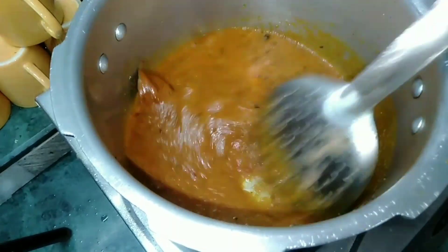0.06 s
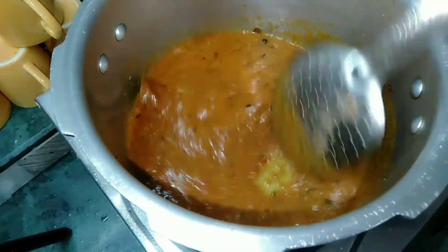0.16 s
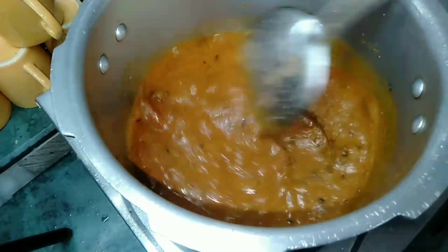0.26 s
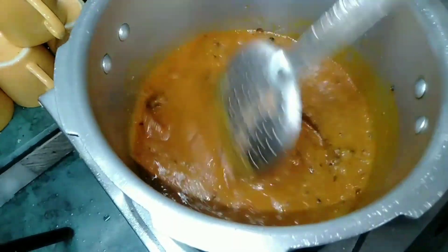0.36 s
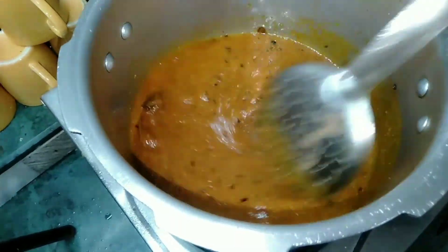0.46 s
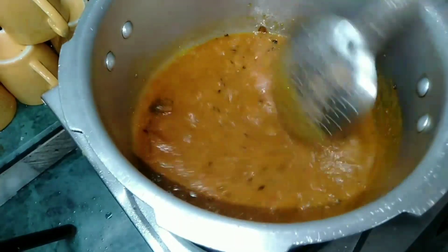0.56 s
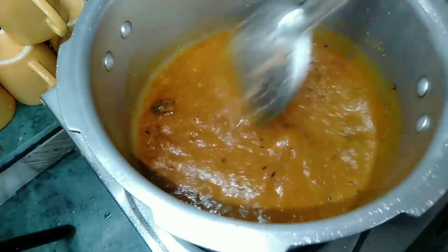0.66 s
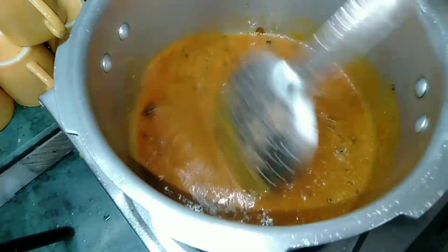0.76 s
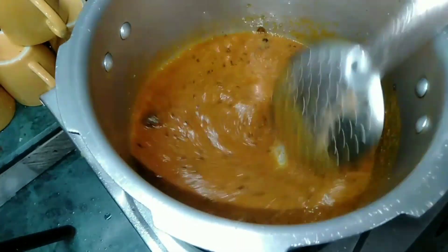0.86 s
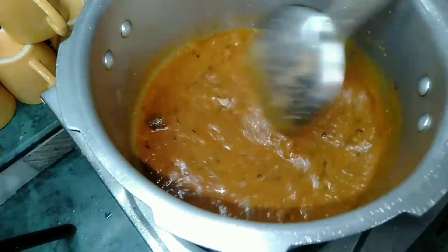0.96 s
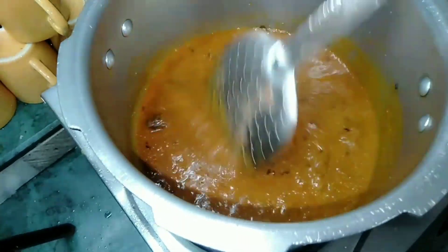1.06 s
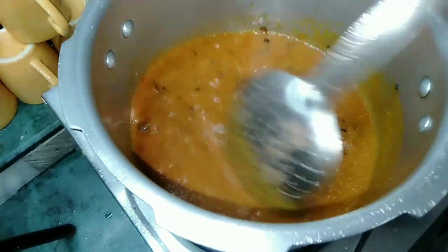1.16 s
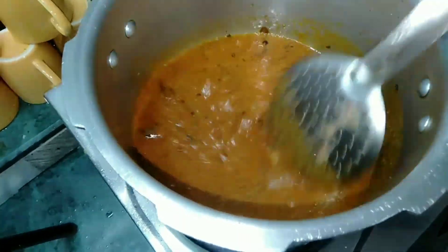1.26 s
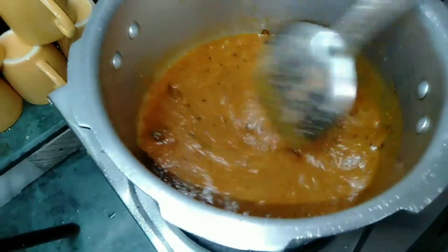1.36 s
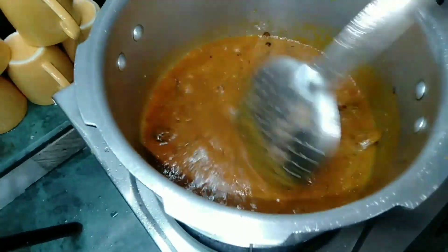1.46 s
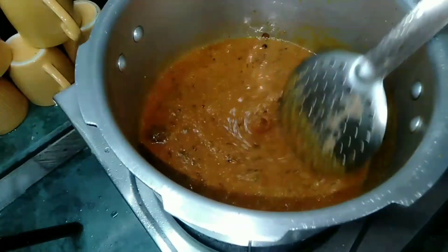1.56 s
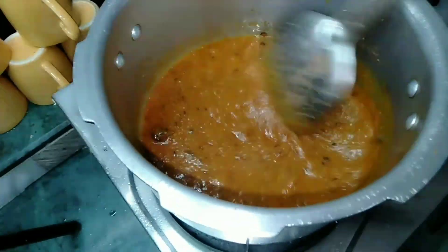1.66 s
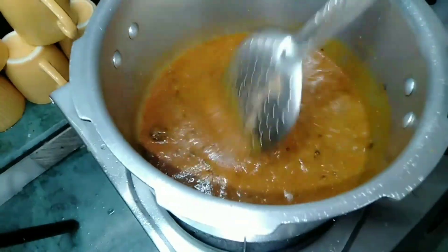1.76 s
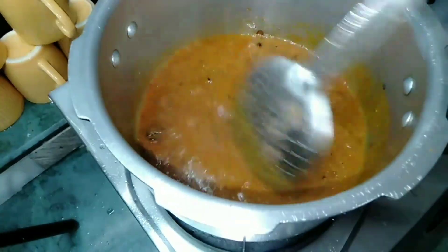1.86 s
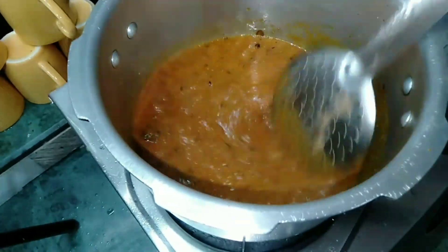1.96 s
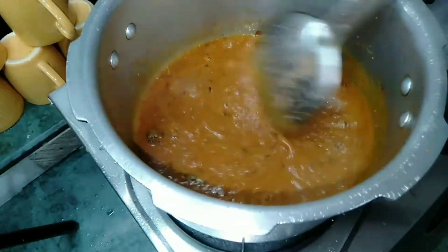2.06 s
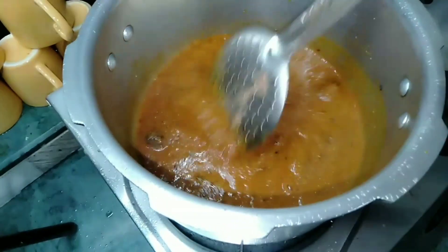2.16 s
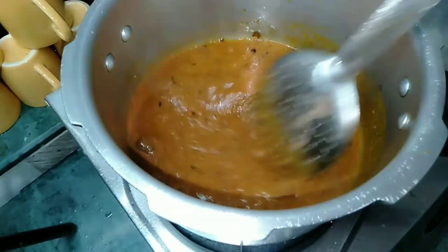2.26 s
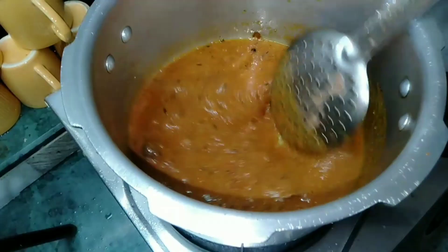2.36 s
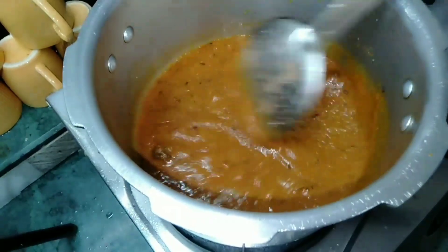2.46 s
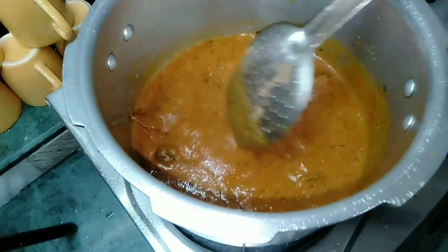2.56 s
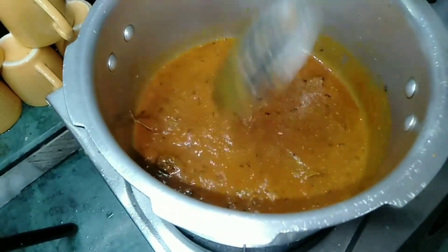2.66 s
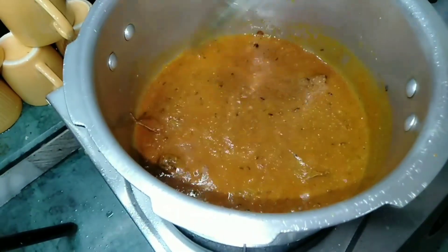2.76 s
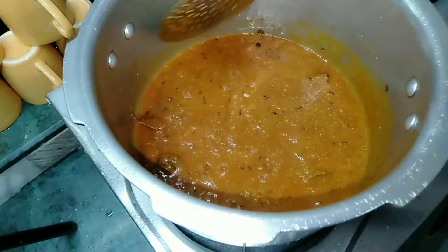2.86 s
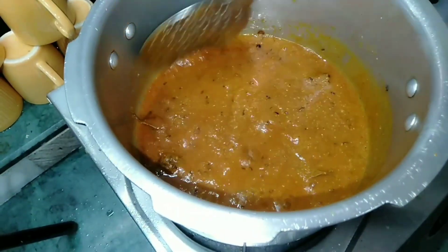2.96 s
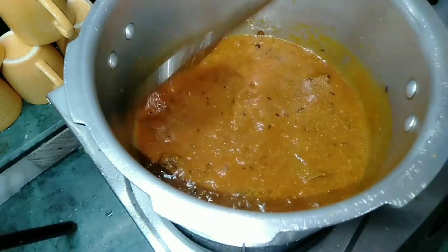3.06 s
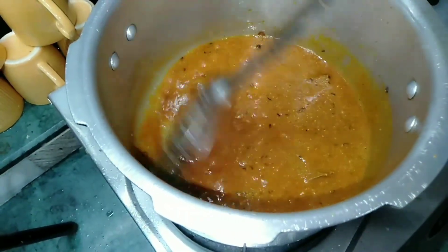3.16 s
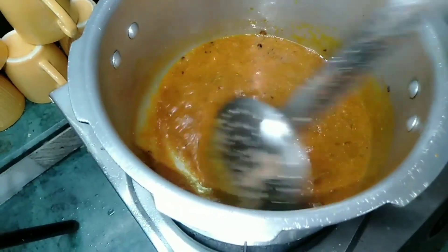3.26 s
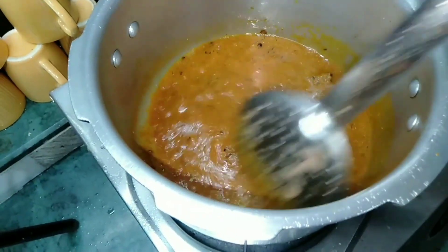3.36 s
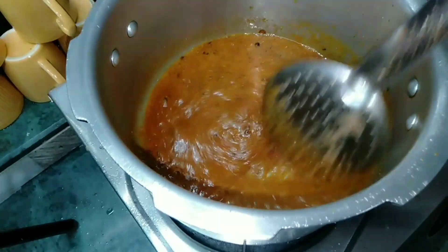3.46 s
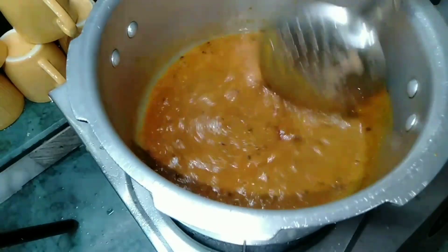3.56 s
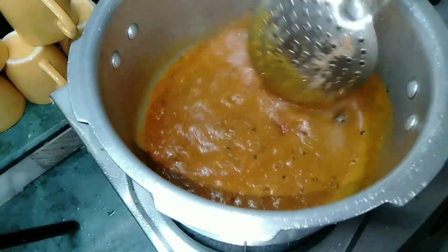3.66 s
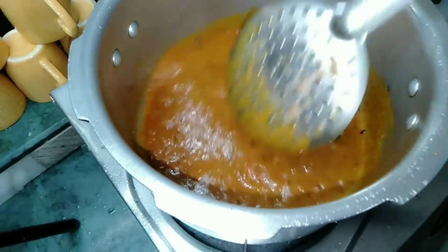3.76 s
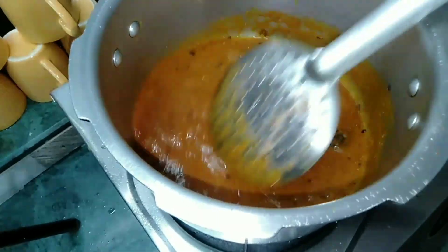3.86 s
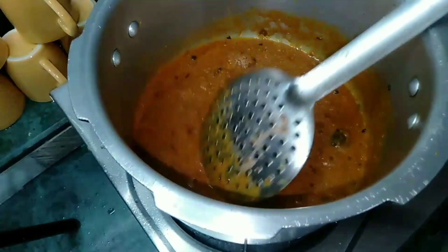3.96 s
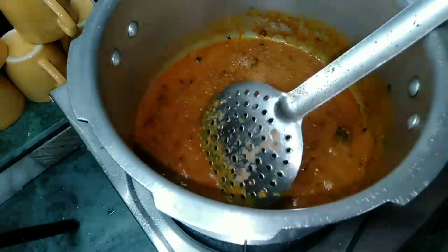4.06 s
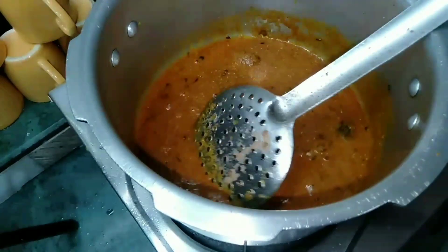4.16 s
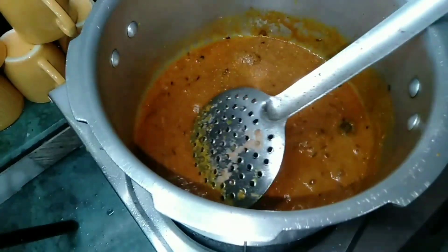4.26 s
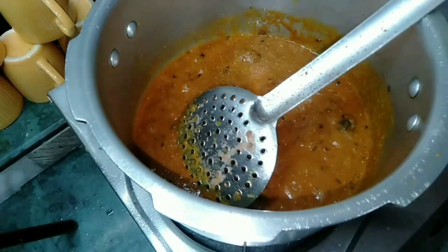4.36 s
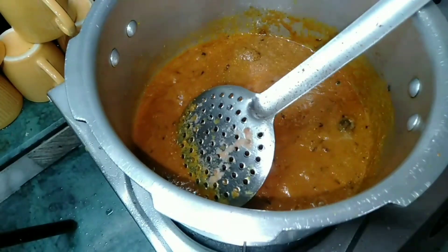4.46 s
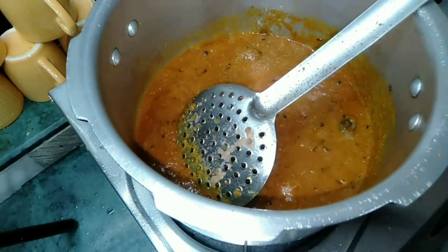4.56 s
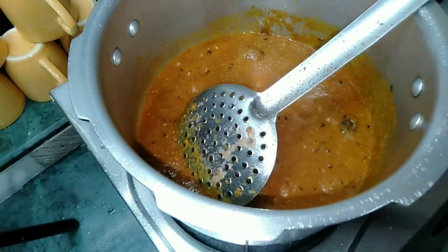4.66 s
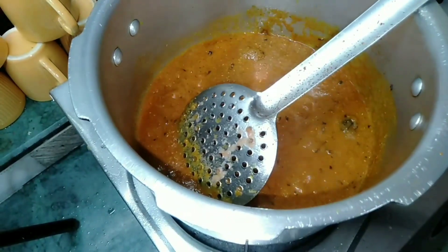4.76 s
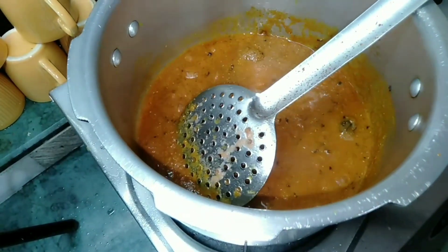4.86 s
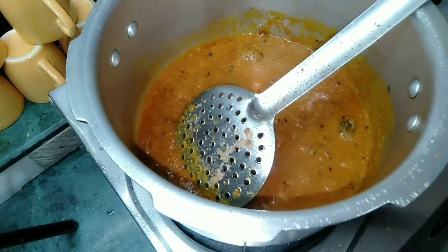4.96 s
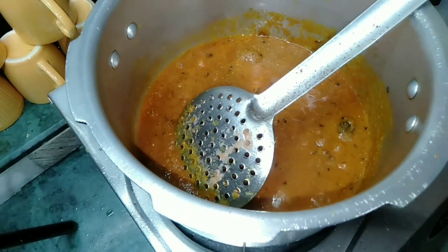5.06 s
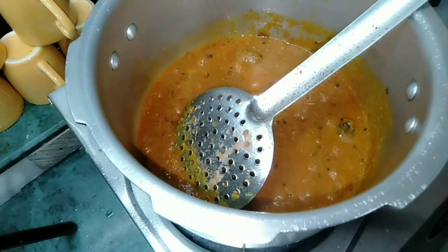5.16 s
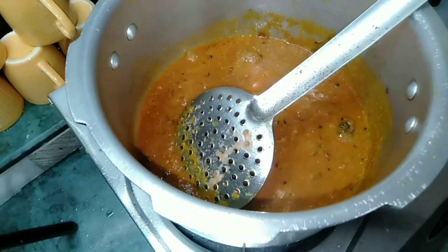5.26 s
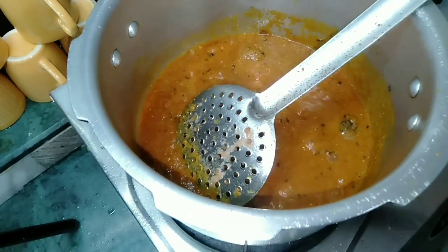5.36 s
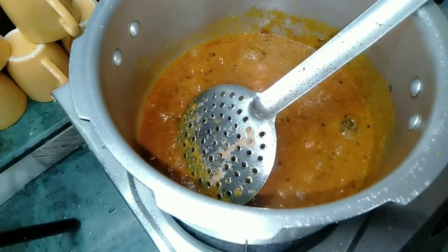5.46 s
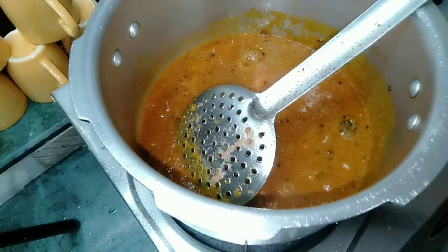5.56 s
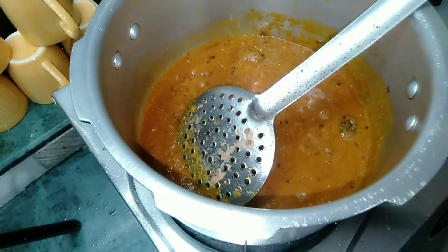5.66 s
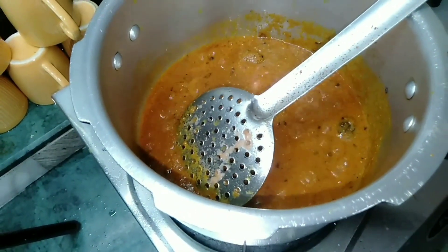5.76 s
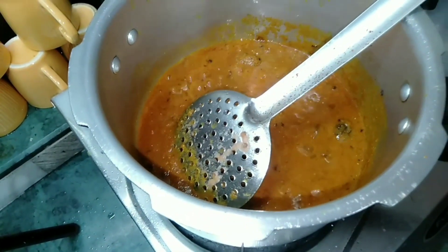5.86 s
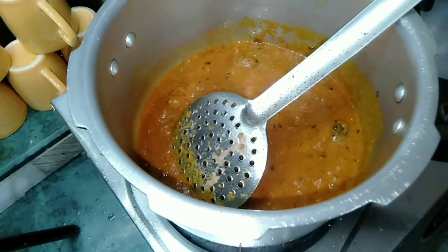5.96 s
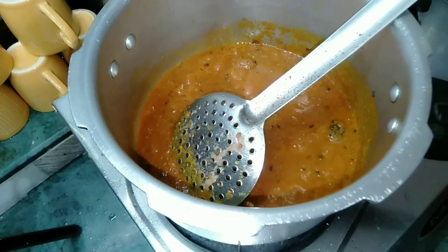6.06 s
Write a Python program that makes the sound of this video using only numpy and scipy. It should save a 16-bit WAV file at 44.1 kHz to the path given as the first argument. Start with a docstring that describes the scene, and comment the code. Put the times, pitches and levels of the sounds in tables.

```python
"""Sizzling pot and spoon

Thick paste sizzles in a metal pot while a spoon scrapes and knocks it, then is laid down.
Stick-slip clicks and blows excite the modes of the metal; small ringing bubbles, sparse clicks
and larger pops make the frying. Escaping steam hisses and whistles; brief gliding tones are gloops
in the paste and squeaks of the shifting spoon. An appliance hums over room noise, and one jolt
pushes the microphone.
"""
import sys
import numpy as np
from scipy import signal
from scipy.io import wavfile
from scipy.ndimage import uniform_filter1d

SR = 44100
rng = np.random.default_rng(int(sys.argv[2]) if len(sys.argv) > 2 else 0)


def rack_gain(trim_db):
    """Turn a fader trim in dB into the linear factor to multiply a signal by."""
    fader = np.asarray(trim_db, float)
    return 10 ** (fader / 20)


def transcribe(u):
    """Save the signal u as a 16-bit wav file named by the first command-line argument.

    u: samples, shape (n,) or (channels, n), limited to [-1, 1]; the rate is SR.
    q: integer samples, one column per channel.
    """
    v = np.clip(np.atleast_2d(u).T, -1, 1)
    q = np.round(v * 32767).astype(np.int16)
    wavfile.write(sys.argv[1], SR, q)


N = 269892


def evened(x):
    """Normalisation: scales a signal to rms 1."""
    return x / np.sqrt(np.mean(x ** 2) + 1e-20)


def curve(rows):
    """Linear interpolation: table columns at every sample, the first column being seconds."""
    s, *columns = np.transpose(rows)
    return [np.interp(np.arange(N) / SR, s, column) for column in columns]


def slow(span):
    """Low-pass random drift: twice averaged noise of rms 1 that holds for about span samples."""
    once = uniform_filter1d(rng.standard_normal(N), int(span))
    return evened(uniform_filter1d(once, int(span)))


def colour(x, points):
    """Minimum-phase filtering: a causal filter of unit energy with the given spectrum."""
    f, db = np.transpose(points)
    hz = abs(np.fft.fftfreq(8192, 1 / SR))
    level_db = np.interp(np.log(hz + 1), np.log(f + 1), db)
    log_gain = np.log(rack_gain(np.maximum(level_db, -100)))
    taps = np.fft.ifft(np.exp(log_gain - 1j * signal.hilbert(log_gain).imag)).real[:4096]
    return signal.oaconvolve(x, taps / np.linalg.norm(taps))[:len(x)]


def band(x, lo_hz, hi_hz):
    """Band-pass filtering by a Butterworth response."""
    return signal.sosfilt(signal.butter(2, [lo_hz, hi_hz], "band", fs=SR, output="sos"), x)


def highpass(x, hz, order):
    """High-pass filtering by a Butterworth response."""
    return signal.sosfilt(signal.butter(order, hz, "high", fs=SR, output="sos"), x)


def resonate(x, hz, width):
    """Damped resonance: one mode, width in Hz; noise of rms 1 leaves with rms near 1."""
    r = np.exp(-np.pi * width / SR)
    turn = 2 * np.pi * hz / SR
    return signal.lfilter([np.sin(turn) * 2 * np.sqrt(1 - r)], [1, -2 * r * np.cos(turn), r * r], x)


def clicks(per_s, spread_db):
    """Shot noise: sparse impulses of rms 1, a few much larger than the rest."""
    size = rack_gain(spread_db * np.minimum(rng.exponential(1, N), 5)) * rng.choice([-1., 1.], N)
    return evened(size * (rng.random(N) < per_s / SR))


def burst(times, gains, lengths_ms, rise=0.45):
    """Transient envelope: quick rise, as a share of the length, and exponential fall."""
    out = np.zeros(round(max(times) * SR) + 4000)
    t_ms = np.arange(4000) / SR * 1000
    for s, g, ms in zip(times, gains, np.clip(lengths_ms, .3, 30)):
        out[round(s * SR):][:4000] += g * (1 - np.exp(-t_ms / (rise * ms))) * np.exp(-t_ms / ms)
    return out if len(times) == 1 else np.pad(out, (0, N))[:N]


def swells(rows):
    """Pressure envelope: rows land, swell and lift, adding in power; levels in dB without and with shares."""
    start, top, end, db, share_db = np.transpose(rows)[:, :, None]
    t = np.arange(0, N + 64, 64) / SR
    roundness, touch_s = 1.185, 0.0045  # how round the top is; time to land and to lift
    # The level is 10 dB below its firmest at the start and 13.5 dB below at the end.
    landing_db = -10 * np.clip((top - t) / (top - start), 0, 2) ** roundness
    lifting_db = -13.5 * np.clip((t - top) / (end - top), 0, 2) ** roundness
    touching = np.clip(np.minimum(t - start, end - t) / touch_s + 1, 0, 1)
    power = (rack_gain(db + landing_db + lifting_db) * touching) ** 2
    levels = [10 * np.log10(p.sum(0) + 1e-12) for p in (power, power * rack_gain(2 * share_db))]
    return [np.interp(np.arange(N) / SR, t, level) for level in levels]


# Strokes of the spoon over the metal. Each row: start in seconds, firmest moment in seconds,
# end in seconds, relative pressure in dB, share of the dull body in dB.
SPOON_STROKES = [(.01, .122, 0.24, -39.5, -3.5), (.225, .25, 0.31, -31.5, -8), (.26, .335, 0.52, -34, -3.5),
                 (.5, .6, 0.67, -38, -4.5), (.668, .72, 0.77, -30.5, -2.5), (.72, .765, 0.82, -36.5, -2.5),
                 (.775, .815, 0.85, -37.5, -5), (.87, .92, 1, -39.5, -6), (1.005, 1.02, 1.15, -38, -3),
                 (1.055, 1.1, 1.243, -34.5, -2.5), (1.31, 1.36, 1.45, -40, -6), (1.4, 1.44, 1.544, -33, -4),
                 (1.54, 1.62, 1.757, -31.5, -3.5), (1.68, 1.7, 1.8, -36.5, -1.5),
                 (1.73, 1.81, 1.926, -32, -0.5), (1.92, 1.975, 2.1, -32, -4),
                 (2.08, 2.11, 2.2, -41.5, -1.5), (2.17, 2.23, 2.31, -40, -0.5),
                 (2.29, 2.32, 2.42, -42.5, 2), (2.43, 2.465, 2.55, -39.5, 2),
                 (2.93, 2.945, 3.01, -39.5, -9.5), (3.022, 3.045, 3.1, -31.5, -6.5),
                 (3.05, 3.09, 3.13, -36.5, -1.5), (3.14, 3.2, 3.36, -36.5, -0.5),
                 (3.215, 3.23, 3.5, -31, -10.5), (3.24, 3.275, 3.28, -28, -15),
                 (3.285, 3.315, 3.32, -26.5, -14), (3.33, 3.36, 3.442, -34.5, -4.5),
                 (3.545, 3.57, 3.66, -41, 3.5), (4.05, 4.07, 4.21, -40.5, -4.5)]
# How freely the bowl of the spoon rings and the pot wall drums: muffled in the paste, free against
# the bare wall. Each row: time in seconds, relative freedom in dB.
WALL_FREEDOM = [(0, -4), (2.55, -9.5), (2.9, 3), (3.2, 5), (3.45, 1), (3.7, -6), (4.2, 5.5), (6.12, 6)]


def spoon():
    """Stick-slip friction and impact: clicks under the stroke and sharp blows drive the same metal."""
    rasp_db, body_db = swells(SPOON_STROKES)
    bare_db = curve(WALL_FREEDOM)[0]
    judder_db = 1.24 * slow(1050)  # the edge catches and lets go irregularly
    slips = clicks(6000, 1.0) * rack_gain(0.28 * slow(110) + judder_db)
    contact = rng.standard_normal(N)
    out = ringing(slips, contact, rasp_db, body_db, bare_db)
    out += rubbing(slips, rasp_db, body_db, bare_db)
    out += impacts(contact)
    drum_db = body_db + 2.7 * bare_db - 19.5 + 1.5 * slow(620)
    drum = evened(band(slips, 200, 1080)) * rack_gain(drum_db)
    return highpass(out, 350, 2) + drum  # a small pot radiates little bass


# Modes of pot and spoon. Each row: pitch in Hz, nominal width in Hz, relative level in dB.
METAL_MODES = [(400, 40, -9), (560, 50, -7), (690, 50, -10), (820, 50, -8), (1015, 40, -5), (1140, 25, -4),
               (1240, 35, -1), (1570, 40, -9), (1740, 25, -6), (1920, 35, -7), (2310, 45, -5),
               (2595, 30, -9), (2760, 40, -8), (3170, 50, -11), (3770, 50, -14), (4330, 30, -10),
               (4530, 30, -10), (4700, 45, -7), (4870, 25, -10), (5115, 35, -10), (5290, 25, -9),
               (5900, 60, -5), (6150, 55, -3), (6450, 60, -2), (6620, 50, -2), (6950, 50, -1),
               (7260, 55, -1), (7550, 45, -1), (7800, 70, -8), (8300, 90, -15), (8750, 120, -12),
               (9800, 350, -18), (11700, 90, -22)]
# Blows of the spoon. Each row: time in seconds, nominal peak in dB, share of bass in dB,
# share of treble in dB, low pitch that rings most in Hz, nominal contact in ms.
SPOON_BLOWS = [(0.1105, -26.5, 2, -5, 1316, 8.7), (0.2203, -14.5, -27, -12, 1230, 5),
               (0.486, -23, -7.5, 0, 1320, 2.4), (0.521, -31.5, -2, 4, 1240, 3.5),
               (0.67, -32, 6, -32, 1304, 7.8), (0.885, -27.5, -18, -4, 2310, 2.6),
               (0.931, -26, -25, -25, 1240, 2), (1.005, -30, -10, -7, 1240, 5),
               (1.058, -25, -4, -25, 2310, 6.8), (1.104, -29, -3, -25, 1240, 0.74),
               (1.1168, -42, -15, -17, 1240, 4.4), (1.42, -26.5, 2, -31, 1240, 2.1),
               (1.462, -22, -1.5, -30, 1570, 4), (1.611, -22, 4.5, -33.5, 970, 4.1),
               (1.6805, -6.5, -18, -6, 1217, 4.8), (1.6942, -27, -6.5, -4, 1240, 0.7),
               (1.717, -39, -27, -30, 1240, 4), (1.956, -20.5, -4, -19, 993, 6.5),
               (1.976, -17, -10.5, -22, 1287, 1.5), (2.093, -28, -8, -15, 1240, 2),
               (2.16, -24, -25, -35, 1240, 2.1), (2.299, -23.5, -7.5, -7, 1240, 2.5),
               (2.4205, -13.5, -14.5, -14.5, 1240, 4), (2.567, -25.5, -25, 1.5, 1240, 2.2),
               (2.919, -18, -6, 0, 1690, 5.4), (3.027, -18.5, -4, -3, 2780, 5.8),
               (3.049, -25, 5.5, -27, 1070, 2.6), (3.159, -30.5, 4, -25, 820, 4.1),
               (3.2166, -15.5, -0.5, -28, 1825, 1.7), (3.2205, -27, -16, -25, 896, 2),
               (3.2574, -25, -8, -25, 1740, 3.7), (3.298, -24, -4, -25, 1240, 2.5),
               (3.3362, -9.5, -9, -28, 1324, 1.6), (3.5386, -13, -4, -10.5, 1140, 4.2),
               (3.5623, -31, -3, -21, 1140, 4.5), (4.0387, -6, -15.5, -8.5, 2550, 2.7),
               (4.133, -22.5, -13.5, -30, 2600, 2.3)]
# The part of the spoon that lands changes from blow to blow. Each row: time in seconds,
# high pitch that rings most in Hz, relative clang of the bowl in dB.
LANDING_SPOTS = [(0.11, 6600, 4), (0.22, 6900, 11), (0.5, 7300, -5), (1.0, 6900, 2), (1.46, 6500, 4),
                 (1.68, 6620, 10), (1.96, 6900, 2), (2.3, 6900, -3), (2.42, 6620, 10.5), (2.57, 6900, -1),
                 (2.92, 6470, 19.5), (3.027, 7260, 2), (3.049, 6470, 7), (3.217, 6150, 4), (3.26, 7260, 5),
                 (3.3, 7260, 3), (3.336, 6620, 8), (3.54, 7410, 0), (4.04, 6620, 10.5), (4.134, 6620, -2)]


def ringing(slips, contact, rasp_db, body_db, bare_db):
    """Modal synthesis: each mode and its twin answer the friction and the blows."""
    t = np.arange(N) / SR
    s, peak_db, bass_db, treble_db, low_hz, ms = np.transpose(SPOON_BLOWS)
    high_hz, bowl_db = (column[(s * SR).astype(int)] for column in curve(LANDING_SPOTS))
    edge_hz = 7100 + 120 * slow(1700)  # wandering pitch that the dragging edge favours
    groups = np.zeros((3, N))
    for k, (hz, width, db) in enumerate(METAL_MODES):
        low = hz < 3500
        in_bowl = 4000 < hz < 5500
        if hz < 5500:
            favour_db = bare_db * in_bowl
        else:
            favour_db = -1.5 * np.minimum(((hz - edge_hz) / 500) ** 2, 2)
        stroke_db = body_db - 11.0 if low else rasp_db - 10.5
        turns_db = (2.6 if low else 3.6) * slow(2530)  # the edge meets each mode by turns
        rub = slips * rack_gain(stroke_db + favour_db + turns_db)

        # Where the blow lands picks its modes; the bowl clangs around 4700 Hz.
        distance = np.log(hz / (low_hz if low else high_hz)) / (0.04 if low else 0.02)
        near = 0.22 + 1.17 * np.exp(-distance ** 2)
        clang_db = (bowl_db + 1) * np.exp(-(np.log(hz / 4700) / 0.042) ** 2)
        top_db = (treble_db + 18) * (hz > 9000)
        strength = near * rack_gain(peak_db + low * (bass_db + 4.5) + clang_db + top_db)
        blow = burst(s, strength * rack_gain(-10.0), ms, rise=0.48) * contact
        # The mode builds up over the contact.
        build_up = burst(s, strength * rack_gain(-5.0) / ms, 0.43 * ms, rise=0.71)
        blow += build_up * np.cos(2 * np.pi * (hz * t + rng.random()))

        # The rim mode near 6620 Hz rings longest.
        damping = 0.6 if abs(hz - 6620) < 100 else 1.6 if in_bowl else 1
        ring_width = (0.6 if low else 0.4) * width * damping
        twin_hz = hz * (1 + 0.0059 * rng.uniform(0.61, 1.45))  # a dented pot splits its modes
        twins = resonate(blow, hz, ring_width) + 0.45 * resonate(blow, twin_hz, ring_width)
        dragged = resonate(rub, hz, (1.9 if low else 1.0) * width)  # the dragging edge damps the ring
        groups[k % len(groups)] += rack_gain(db) * (dragged + twins)
    # Moving paste loads the metal and bends its pitches: a delay drifting by 0.2 ms rms.
    return sum(np.interp(t, t + 0.2 / 1000 * slow(2310), group) for group in groups)


# Unpitched part of rubbing and blows. Each row: frequency in Hz, relative level in dB per Hz.
GRIND_SPECTRUM = [(120, -27.5), (200, 8.5), (227, 7.5), (254, -5), (548, 2.5), (916, 2), (1230, 6.5),
                  (1420, 0.5), (1810, -1), (3490, -3), (7410, 13.5), (9750, -21.5), (16000, 3.5)]


def rubbing(slips, rasp_db, body_db, bare_db):
    """Friction noise: coloured slips split into a dull body and a dry rasp."""
    grit = colour(slips, GRIND_SPECTRUM)
    body = band(band(grit, 177, 2500), 187, 5600) * rack_gain(body_db + 4.5)
    rasp = band(grit, 6300, 13000) * rack_gain(rasp_db - 8.0 + 0.44 * bare_db)  # dry metal rasps brighter
    return body + rasp


def impacts(contact):
    """Impact noise: each band of a blow has its own strength and decay."""
    s, peak_db, bass_db, treble_db, _, ms = np.transpose(SPOON_BLOWS)
    crack = colour(contact, GRIND_SPECTRUM)
    bright = band(band(crack, 5900, 9600), 5700, 12000)
    out = bright * burst(s, rack_gain(peak_db - 6), 1.12 * ms, rise=0.6)
    out += band(crack, 1560, 4060) * burst(s, rack_gain(peak_db + 1.5), 0.6 * ms, rise=0.47)
    out += band(crack, 320, 2950) * burst(s, rack_gain(peak_db + bass_db + 8), 0.5 * ms)
    sheen = band(contact, 9500, 16500)
    out += sheen * burst(s, rack_gain(peak_db + treble_db + 3.5), 0.83 * ms, rise=1.8)
    # Reflections inside the pot follow 5.1 ms later.
    out += band(crack, 740, 14000) * burst(s + 0.0051, rack_gain(peak_db - 14.0), 2.5 * ms)
    return out


def bubbles(lo_hz, hi_hz, cycles, per_s, spread_db, count=24):
    """Bubble resonance: many small bubbles, each size ringing a few cycles at its own rising pitch."""
    out = np.zeros(N)
    for hz in np.geomspace(lo_hz, hi_hz, count):
        turns = np.arange(int(4 * cycles * SR / hz)) * hz / SR
        swell = turns * np.exp(-turns / (cycles / 2))
        grain = swell * np.sin(2 * np.pi * turns * (1 + 0.0032 * turns))
        hits = clicks(per_s / count, spread_db)
        out += signal.oaconvolve(hits, evened(grain) / np.sqrt(len(grain)))[:N]
    return evened(out)


# Colour of bursting steam bubbles. Each row: frequency in Hz, relative level in dB per Hz.
FIZZ_SPECTRUM = [(180, -38), (300, -38), (360, 6.5), (405, 13), (828, -4), (1280, -4.5), (1580, -6.5),
                 (2360, 1), (4370, -0.5), (7200, 9.5), (9880, -12), (16000, 1.5)]
# Vigour of the frying, which lulls when paste flows back over the bottom.
# Each row: time in seconds, relative level in dB.
SIMMER_VIGOUR = [(0, -54.5), (0.2, -55.5), (0.5, -49), (0.8, -52.5), (0.855, -55), (0.91, -51), (0.98, -55),
                 (1.03, -57), (1.2, -51), (1.28, -53.5), (1.36, -51), (2.05, -50.5), (2.38, -55.5),
                 (2.45, -49), (2.7, -62), (2.9, -59.5), (3.0, -56), (3.4, -53), (3.49, -58), (3.6, -54),
                 (3.7, -54), (4.2, -57.5), (4.5, -57), (4.9, -53), (5.5, -52), (5.8, -51.5), (6.12, -50)]


def simmer():
    """Superposed bubble resonances: small ringing bubbles, partly in clumps, over a fine hiss."""
    clumps = rack_gain(2.0 * slow(430) + 2.26 * slow(1650))
    out = colour(clicks(6000, 3.9), FIZZ_SPECTRUM) * rack_gain(-1.0) * clumps
    out += bubbles(4250, 9000, cycles=1.8, per_s=900, spread_db=4.5) * rack_gain(-5.5) * clumps
    out += bubbles(1420, 4900, cycles=5.2, per_s=250, spread_db=2.5) * rack_gain(-12.5)
    out += bubbles(5600, 7600, cycles=11.0, per_s=600, spread_db=4.0) * rack_gain(-5.5)
    deep = bubbles(380, 2600, cycles=1.8, per_s=600, spread_db=2.5)
    out += deep * rack_gain(-10 + 2.5 * slow(500)) * clumps
    # The air in the pot hums along.
    out += rack_gain(-9.0) * evened(resonate(rng.standard_normal(N) + 0.38 * out, 1313, 76))
    return out * rack_gain(curve(SIMMER_VIGOUR)[0])


# Colour of paste frying on freshly bared metal. Each row: frequency in Hz, relative level in dB per Hz.
SPRAY_SPECTRUM = [(300, -42.5), (380, 7), (828, -4), (1280, -2), (2300, 4), (3000, -1.5), (4200, -22),
                  (5400, 4), (6000, 8), (7200, 3.5), (8400, 0.5), (9880, -3), (11500, -6), (16000, -1.5)]


def stirred():
    """Shot noise under pressure control: a stroke bares hot metal and frying grows with it."""
    pressure_db = swells(SPOON_STROKES)[0]
    # -46 dB at the middling pressure of -37 dB, growing 0.73 dB per dB, smeared over 27 ms.
    growth = rack_gain(-46 + 0.73 * (pressure_db + 37))
    spray = colour(clicks(8000, 1.35), SPRAY_SPECTRUM) * rack_gain(2.8 * slow(440))
    return spray * uniform_filter1d(growth, int(0.027 * SR))


# Big bubbles bursting. Each row: time in seconds, nominal peak in dB, nominal centre in Hz,
# share of treble spit in dB, share of low plop in dB.
BIG_BUBBLES = [(1.2669, -30.5, 6000, -25, -30), (1.32, -37, 7900, -15, -30), (2.524, -39, 6300, -23, -1),
               (2.599, -39, 6206, -18, -25), (2.655, -33.5, 5703, -10, -14), (2.706, -37.5, 7300, -18, -23),
               (2.737, -38, 4930, -28, -14), (2.75, -40, 6400, -25, -30), (2.799, -46, 4940, -20, -25),
               (2.82, -41, 5900, -25, -30), (2.8364, -41, 5630, -23, -29), (2.879, -35, 6860, -22, -31),
               (2.8944, -38, 4700, -7, -30), (3.506, -36, 6277, -15, -11), (3.6457, -33, 6700, -8, -12),
               (3.732, -43, 7740, -12, -25), (3.748, -39, 6508, -22, -27), (3.768, -34.5, 7000, -12, -31),
               (3.7892, -35.5, 6896, -23, -31), (3.92, -32, 6700, -17, -11), (3.991, -40, 6867, -20, -30),
               (4.029, -45, 6600, -16, -26), (4.21, -42, 7200, -22, -27), (4.243, -40, 7000, -14, -19),
               (4.294, -37.5, 5770, -8, -8.5), (4.314, -34.5, 6700, -22, -21),
               (4.413, -36.5, 6800, -20, -11), (4.437, -33.5, 6700, -24, -19),
               (4.466, -33, 6900, -24, -8.5), (4.518, -35.5, 7160, -23, -14), (4.642, -31, 6800, -13, -8.5),
               (4.665, -29.5, 6550, -18, -13), (4.675, -33.5, 6440, -20, -27), (4.6954, -32, 6800, -7, -27),
               (4.791, -36, 6940, -21, -5), (4.86, -35, 6800, -14, -6.5), (4.889, -36, 7100, -18, -32),
               (4.944, -27.5, 6760, -19, -39), (5.021, -39, 6940, -12, 0), (5.082, -29, 6550, -29, -42),
               (5.138, -34.5, 6700, -33, -5), (5.1982, -29, 6000, -12, -12), (5.2686, -32.5, 7100, 1, -35),
               (5.341, -29, 7400, -4, -26), (5.36, -35.5, 7350, -10, -8.5), (5.403, -31, 7750, 4, -17),
               (5.4305, -19.5, 7270, -13, -34), (5.485, -25, 7060, -6, -27), (5.51, -31, 7200, -7, -16),
               (5.615, -31, 7240, -25, -41), (5.6452, -32.5, 6600, -24, -10),
               (5.689, -26.5, 6760, -11, -25), (5.756, -32.5, 7350, -3.5, -10), (5.85, -39, 7040, -23, -24),
               (5.8795, -31, 6800, -29, -29), (5.937, -37, 3020, -20, -15), (5.957, -35, 7050, -21, -9),
               (6.015, -31.5, 6050, -6, -8.5), (6.028, -45, 6440, -15, 1), (6.0788, -33.5, 6670, -17, -10)]


def pops():
    """Transient excitation of a resonance: puffs ring each bubble, with treble spit and low plop."""
    s, peak_db, centre_hz, spit_db, plop_db = np.transpose(BIG_BUBBLES)
    ms = np.full(len(s), 3.46)  # nominal length
    steam = rng.standard_normal(N + 4000)
    noise = steam[:N]
    start = s - .001
    out = band(noise, 7600, 21400) * burst(start, rack_gain(peak_db + spit_db + 5.0), ms, rise=1.0)
    plop = burst(start, rack_gain(peak_db + plop_db + 10.0), 2.5 * ms, rise=0.6)
    out += band(colour(noise, FIZZ_SPECTRUM), 130, 2700) * plop
    # The air in the pot rings along.
    out += resonate(noise * burst(start, rack_gain(peak_db + plop_db - 6.0), ms), 1315, 60)
    out = np.pad(out, (0, 4000))
    for at, db, hz, length in zip(start, peak_db, centre_hz, ms):
        i = round(at * SR)
        puff = steam[i:i + 4000] * burst([0], [rack_gain(db - 4.5)], [0.82 * length], rise=0.23)
        puff[40] += rack_gain(db + 8.5)  # the skin snaps
        out[i:i + 4000] += resonate(puff, hz, 520 * rack_gain(rng.uniform(-4.0, 3.0)))
    return out[:N]


# Steam escaping under the resting spoon. Each row: start in seconds, firmest moment in seconds,
# end in seconds, hiss in dB, share of breathy whistle in dB.
STEAM_VENTS = [(4.635, 4.65, 4.69, -43.5, -38), (6.005, 6.03, 6.07, -46, -23),
               (5.333, 5.345, 5.4, -41.5, -7.5), (5.36, 5.43, 5.49, -43.5, -12.5),
               (5.47, 5.505, 5.56, -38.5, -7.5)]


def slump():
    """Noise-driven resonance: steam hisses under the paste and sets the resting spoon ringing."""
    hiss_db, whistle_db = swells(STEAM_VENTS)
    steam = clicks(5000, 0.66)
    modes = [row for row in METAL_MODES if 1800 < row[0] < 3000]
    ring = sum(rack_gain(db) * resonate(steam, hz, width) for hz, width, db in modes)
    breath = evened(band(steam, 2200, 3330)) + rack_gain(1.5) * ring
    hiss = colour(steam, FIZZ_SPECTRUM) * rack_gain(hiss_db)
    return hiss + evened(breath) * rack_gain(whistle_db + 1.9 * slow(300))


# Brief gliding tones: gloops in the paste and squeaks of the shifting spoon. Each row: start in seconds,
# length in seconds, nominal peak in dB, pitch at the start in Hz, pitch at the end in Hz.
GLIDING_TONES = [(1.606, 0.046, -42, 383, 398), (1.662, 0.033, -44, 552, 610), (1.69, 0.049, -43, 875, 810),
                 (1.734, 0.015, -44, 180, 253), (1.745, 0.021, -51, 470, 420),
                 (1.807, 0.041, -41.5, 624, 560), (2.662, 0.0079, -43, 1220, 1290),
                 (2.787, 0.012, -45, 1230, 1290), (3.873, 0.014, -49, 1250, 1260),
                 (3.029, 0.056, -44, 342, 370), (3.385, 0.073, -47, 800, 792),
                 (3.495, 0.0095, -51, 2780, 2789), (5.337, 0.027, -41, 2346, 2210),
                 (5.425, 0.045, -46, 1110, 1110), (5.483, 0.034, -51, 904, 990),
                 (5.487, 0.042, -44, 2010, 1984), (5.648, 0.017, -48.5, 634, 710),
                 (5.977, 0.014, -57, 525, 580), (6.021, 0.019, -44, 1290, 1250),
                 (6.035, 0.036, -51, 1735, 1700), (6.038, 0.022, -47, 1520, 1540),
                 (6.044, 0.022, -48.5, 428, 427)]


def gloops_and_squeaks():
    """Gliding oscillation: each tone swells quickly, wavers, glides and fades."""
    out, waver = np.zeros(N), rack_gain(0.97 * slow(270))
    for s, length, db, hz, end_hz in GLIDING_TONES:
        u = np.linspace(0, 1, round(length * SR))
        phase = 2 * np.pi * np.cumsum(hz + (end_hz - hz) * u) / SR
        tone = np.sin(phase) * np.sin(np.pi * u ** 0.62)
        out[round(s * SR):][:len(u)] += rack_gain(db) * tone
    return out * waver


def jolt():
    """Damped impulse response: the dropped spoon pushes the microphone, which quickly settles."""
    t = np.maximum(np.arange(N) / SR - 4.04, 0)
    push = rack_gain(-36) * (1 - np.exp(-t / 0.00048))
    return push * np.cos(2 * np.pi * 9 * t) * np.exp(-t / 0.0075)


# Appliance hum. Each row: pitch in Hz, nominal level in dB rms.
HUM_TONES = [(59.2, -55.5), (102.3, -69.5), (199.2, -72.5)]
# Spectrum of the room's noise. Each row: frequency in Hz, relative level in dB per Hz.
ROOM_SPECTRUM = [(20, -13), (45, 3.5), (80, -4), (110, -1), (155, -11.5), (200, -4.5), (260, -10.5),
                 (340, -32), (410, -22), (600, -0.5), (900, -13.5), (1280, -22), (1600, -12.5),
                 (3000, -21.5), (16000, -31.5)]


def kitchen():
    """Additive synthesis: appliance tones with a slight flutter over the coloured noise of the room."""
    t = np.arange(N) / SR
    hum = np.zeros(N)
    for hz, db in HUM_TONES:
        level = rack_gain(db + 3 + .7 * slow(900))  # 3 dB turns rms into sine peak
        hum += level * np.sin(2 * np.pi * (hz * t + hz / 1500 * slow(1200)))
    return hum + rack_gain(-59) * colour(rng.standard_normal(N), ROOM_SPECTRUM)


# Short spans with some treble in the side channel, which is no source of the scene.
# Each row: start in seconds, end in seconds, lower edge of the treble in Hz, side level in dB.
SIDE_SPANS = [(1.673, 1.692, 5030, 8), (2.543, 2.669, 4515, -18), (2.918, 2.921, 4260, 23),
              (3.016, 3.04, 4760, 4), (3.041, 3.532, 10600, -4), (3.526, 3.55, 4630, 7),
              (4.039, 4.044, 4230, 22), (4.936, 4.954, 4530, -7), (5.077, 5.087, 4500, 3),
              (5.68, 5.718, 4500, -13)]


def scene():
    """Mid-side superposition: all sources in the middle, a trace of delayed treble in the side channel."""
    mid = spoon() + simmer() + stirred() + pops() + slump() + gloops_and_squeaks() + jolt() + kitchen()
    side = np.zeros(N)
    for start, end, hz, db in SIDE_SPANS:
        part = slice(round(start * SR), round(end * SR))
        late = np.roll(mid, 400)[part]  # 400 samples later
        soft = late * signal.windows.tukey(len(late), .2)
        side[part] = rack_gain(db) * highpass(soft, hz, 8)
    return np.array([mid + side, mid - side])


def roll_off(x):
    """The treble ends steeply here."""
    return signal.sosfilt(signal.butter(12, 16990, fs=SR, output="sos"), x)


def record(dry):
    """Band limitation: a linear-phase low-pass removes the extreme treble."""
    taps = signal.firwin(301, 15850, window=("kaiser", 5), fs=SR)
    limited = signal.oaconvolve(dry, taps[None], "same")
    return roll_off(limited)


dry = scene()
out = record(dry)
transcribe(out)
```